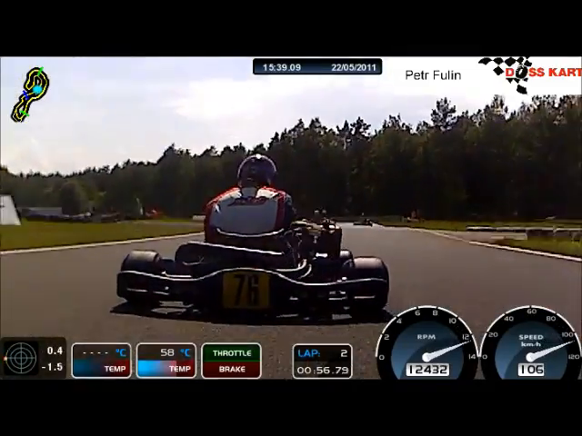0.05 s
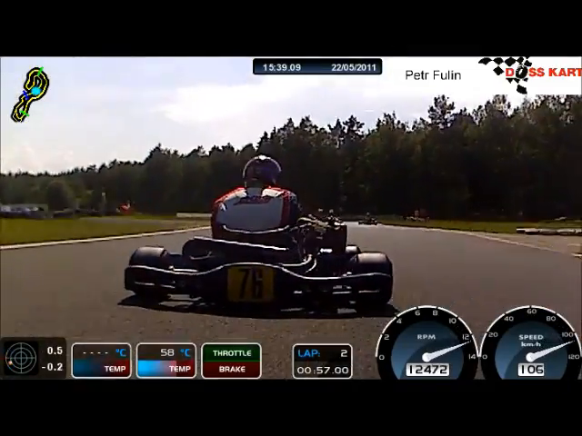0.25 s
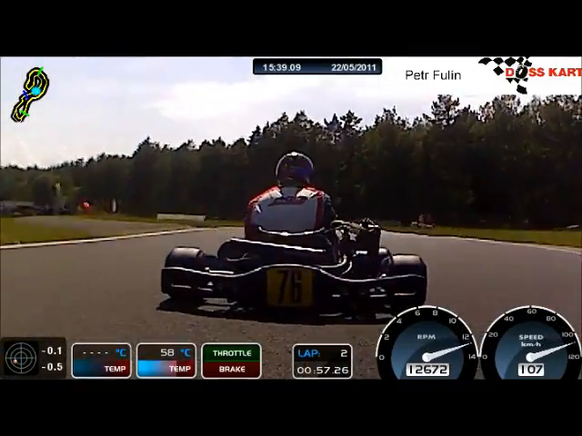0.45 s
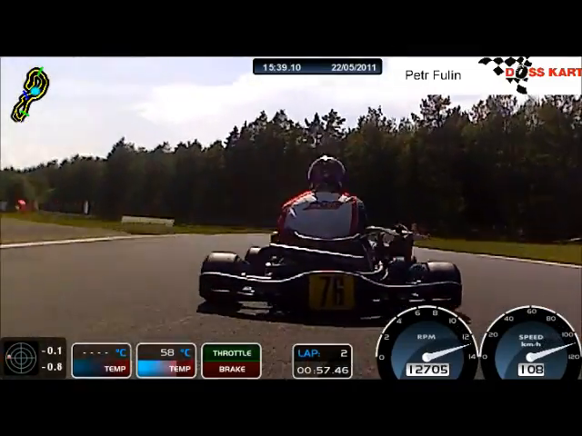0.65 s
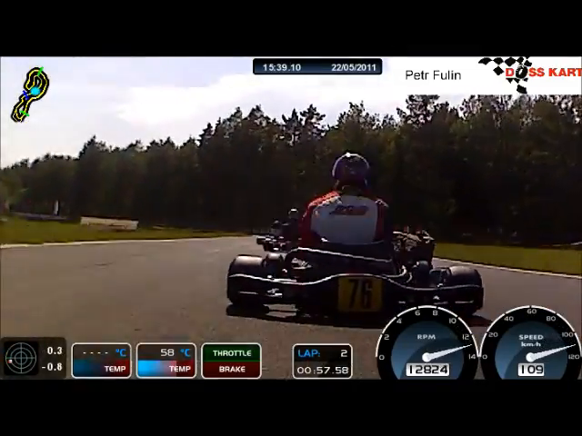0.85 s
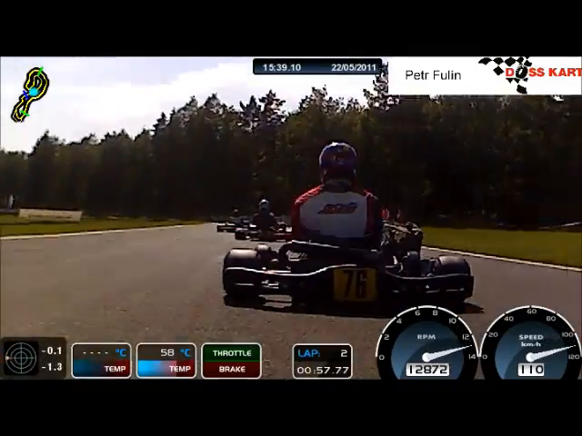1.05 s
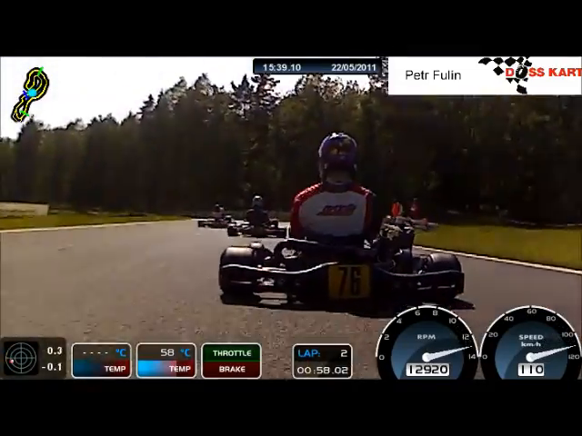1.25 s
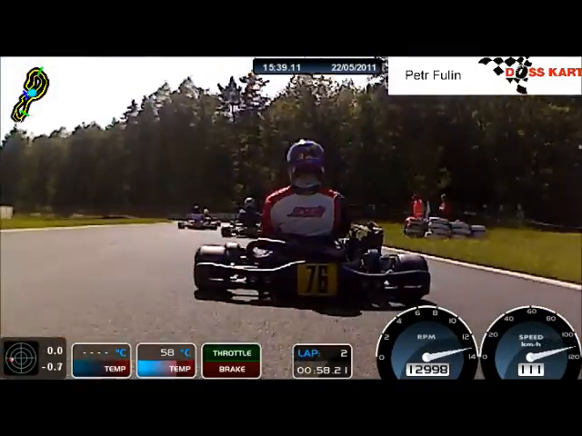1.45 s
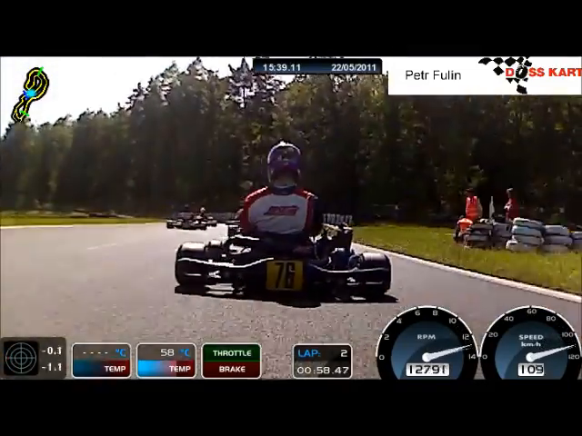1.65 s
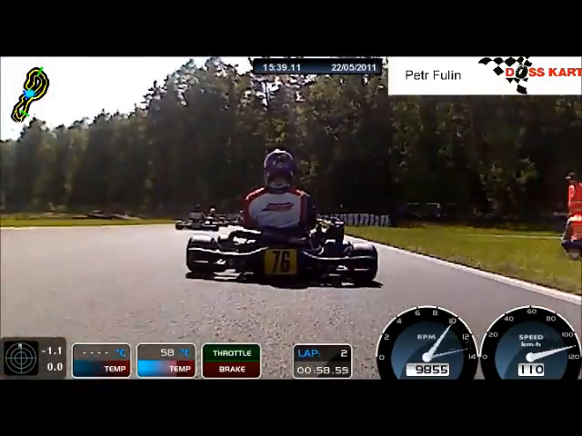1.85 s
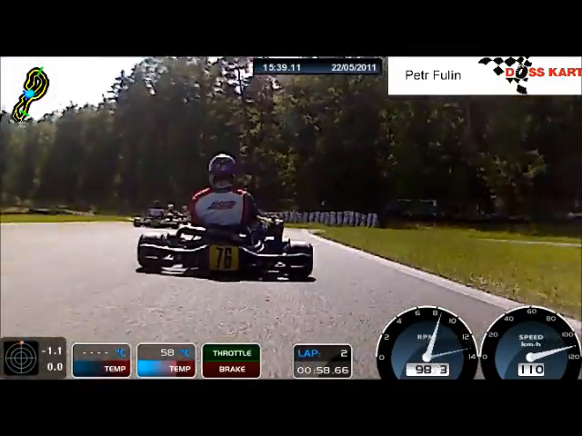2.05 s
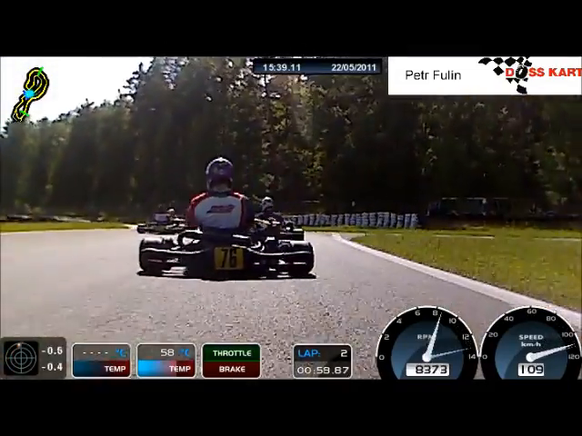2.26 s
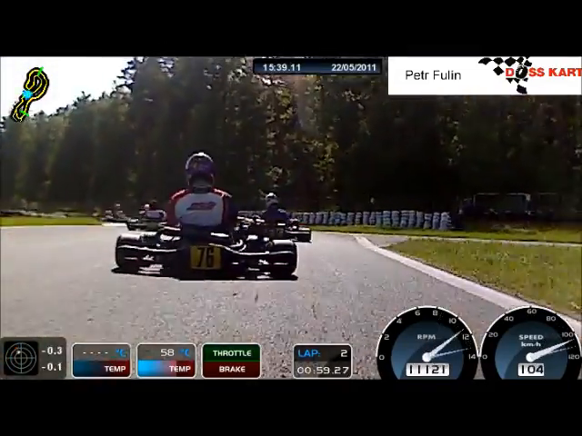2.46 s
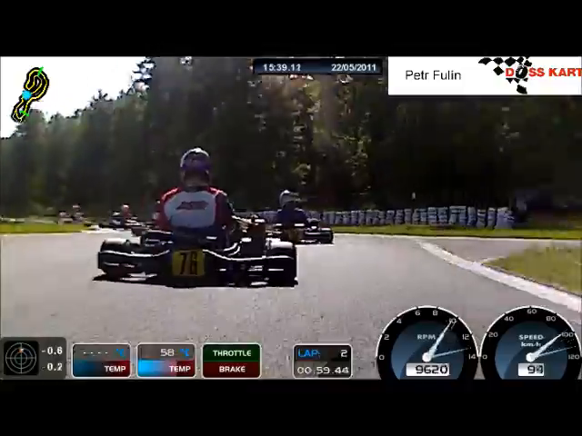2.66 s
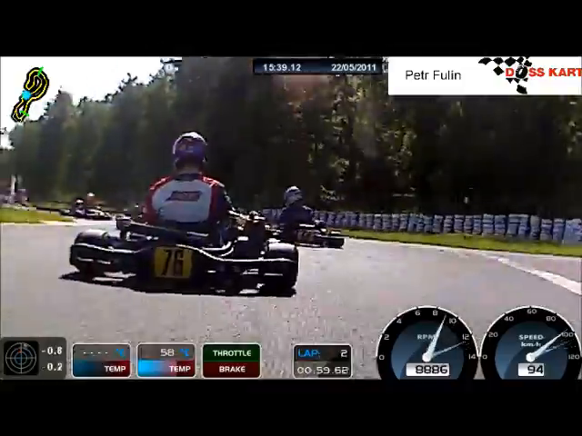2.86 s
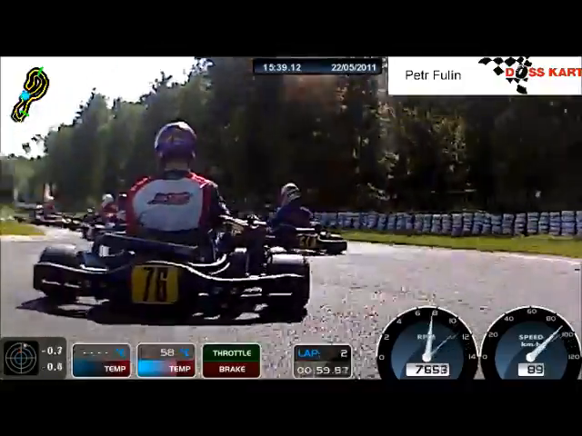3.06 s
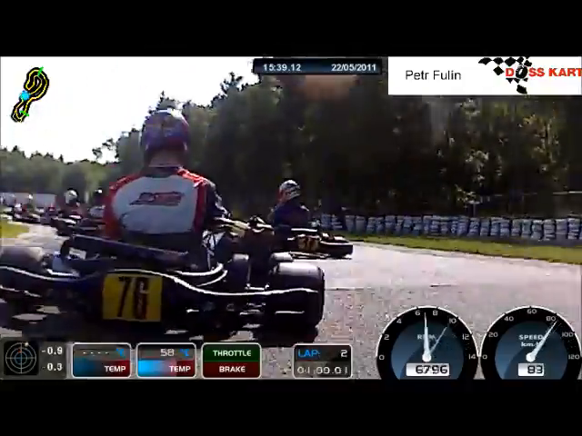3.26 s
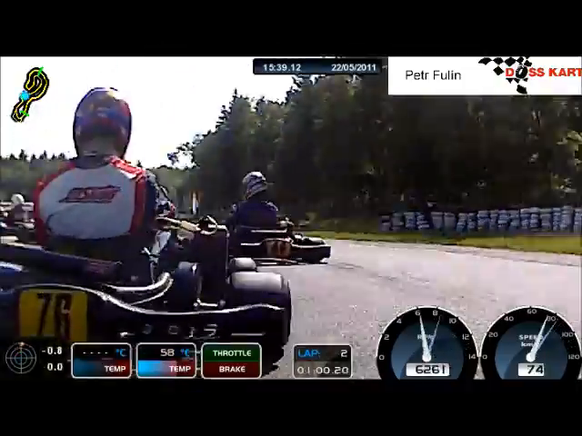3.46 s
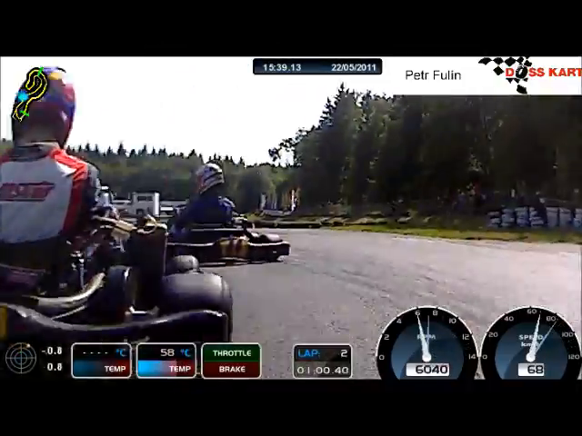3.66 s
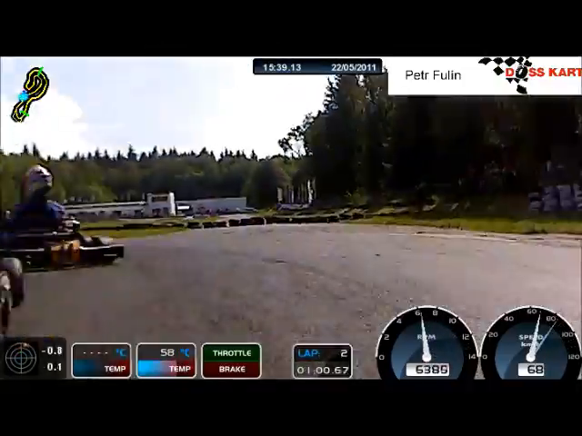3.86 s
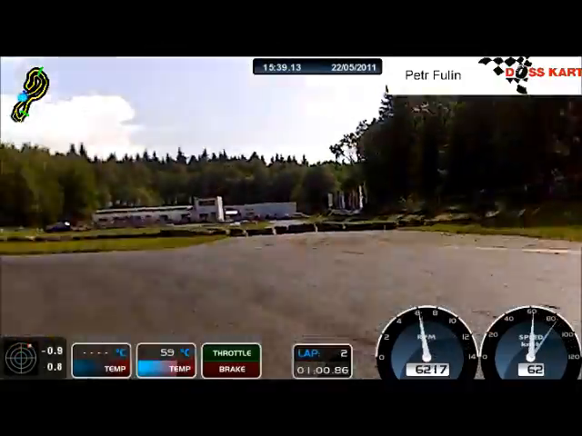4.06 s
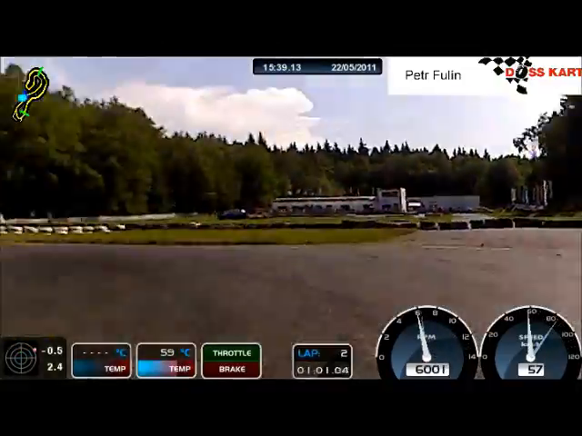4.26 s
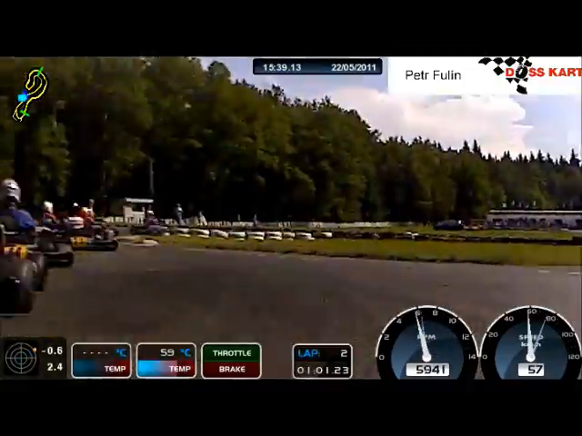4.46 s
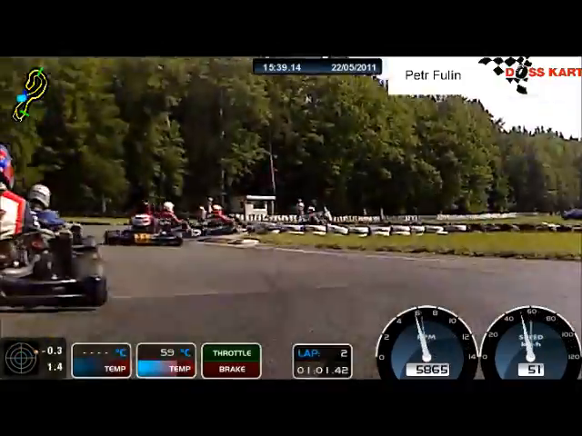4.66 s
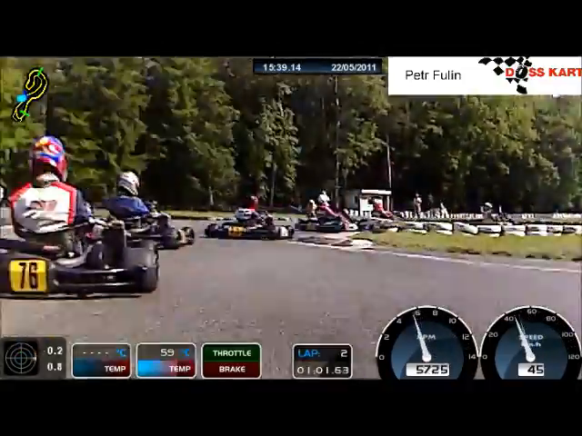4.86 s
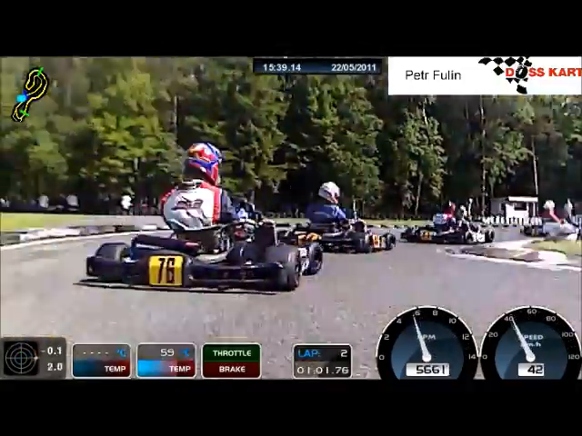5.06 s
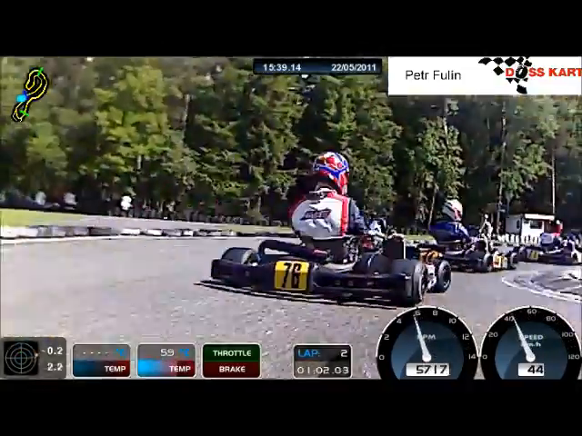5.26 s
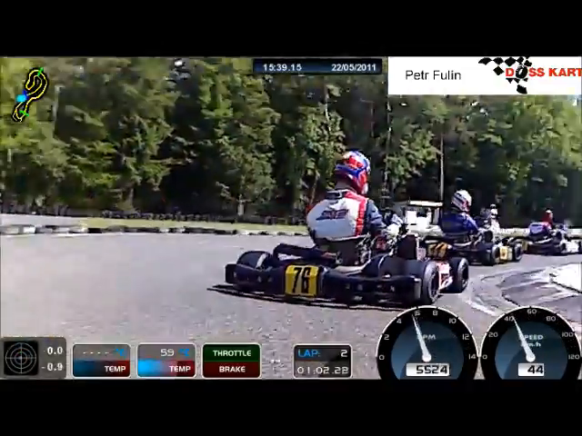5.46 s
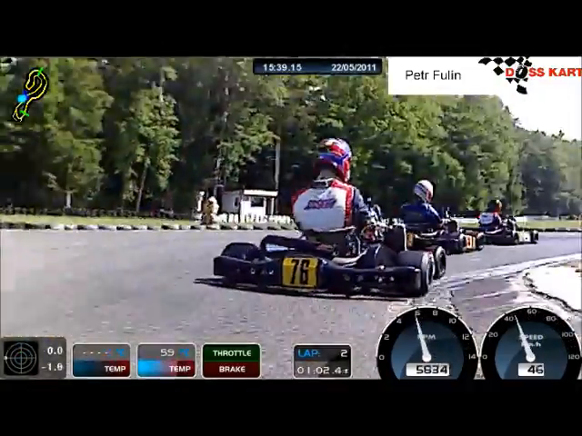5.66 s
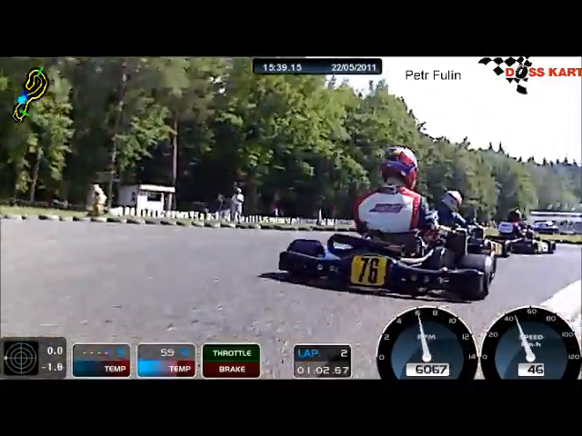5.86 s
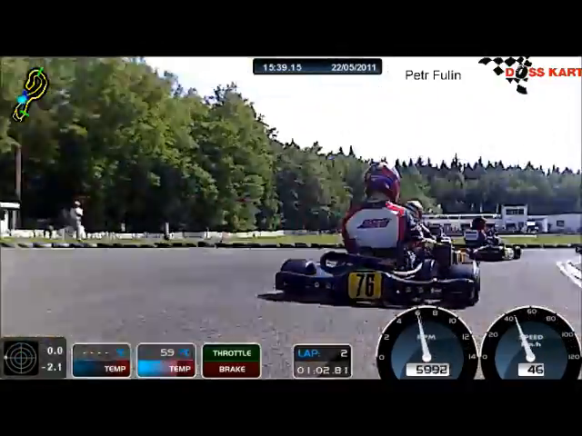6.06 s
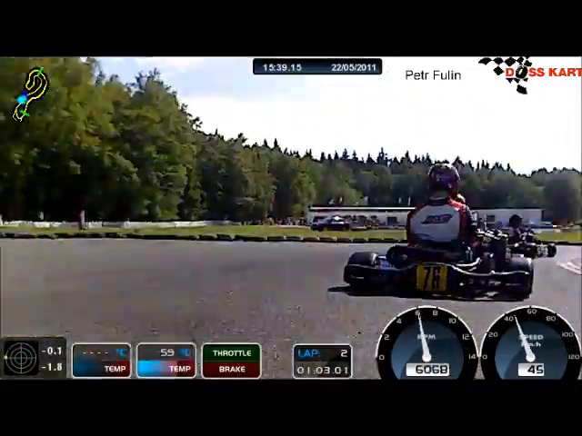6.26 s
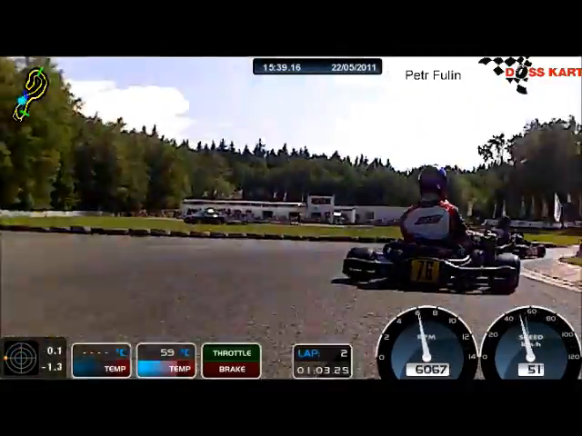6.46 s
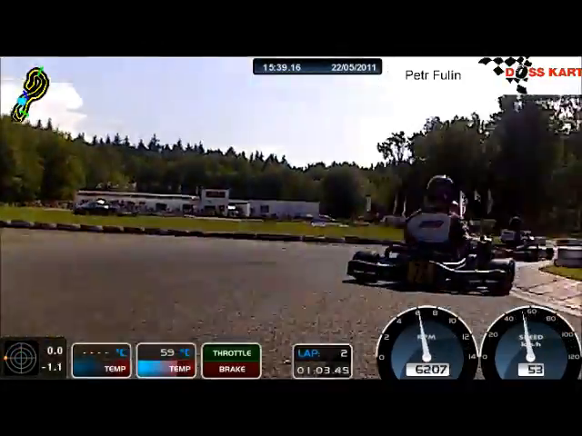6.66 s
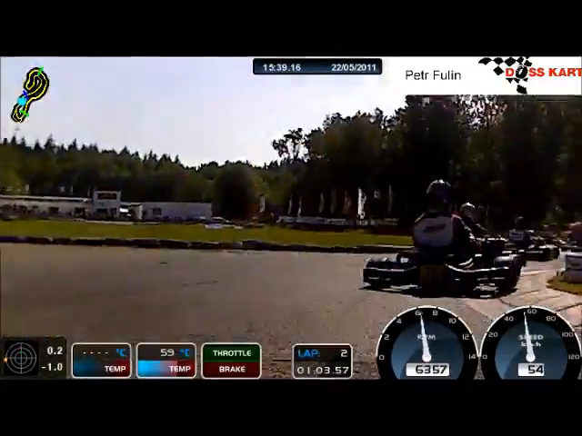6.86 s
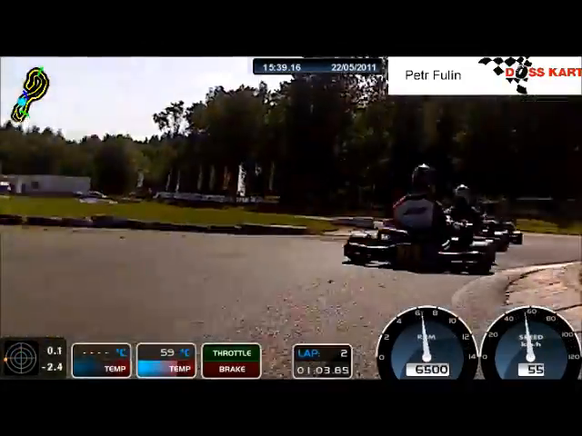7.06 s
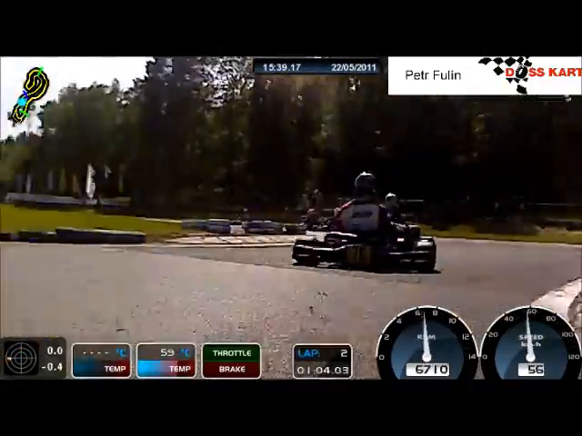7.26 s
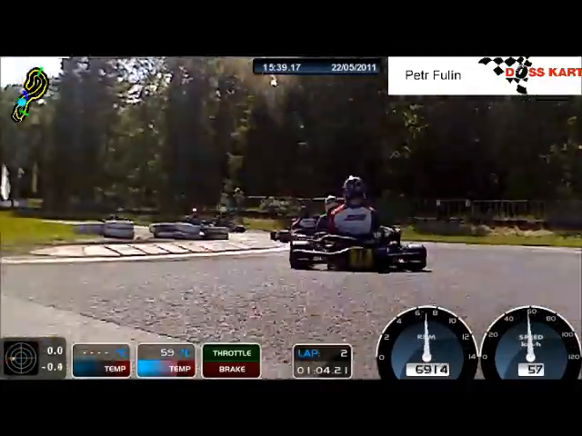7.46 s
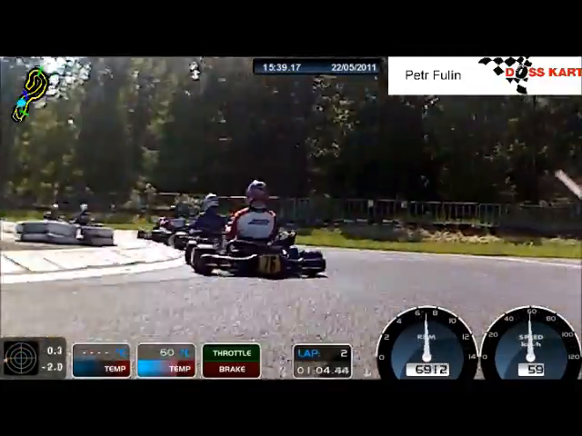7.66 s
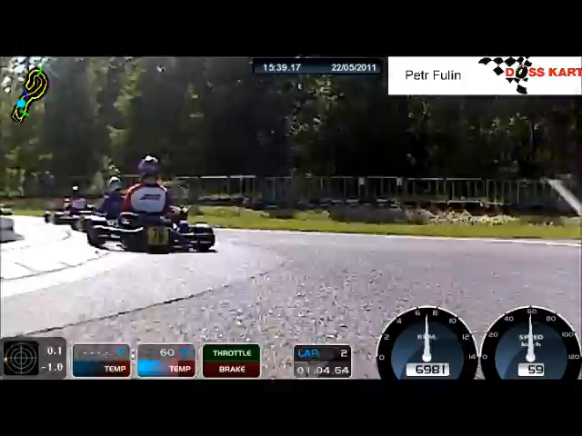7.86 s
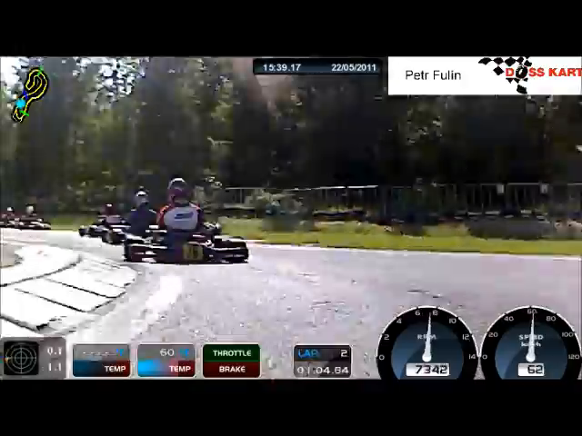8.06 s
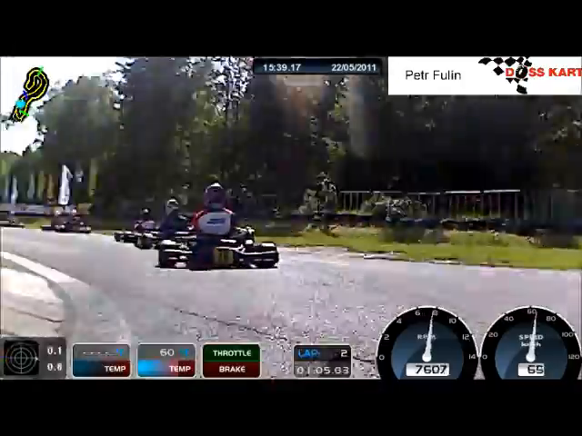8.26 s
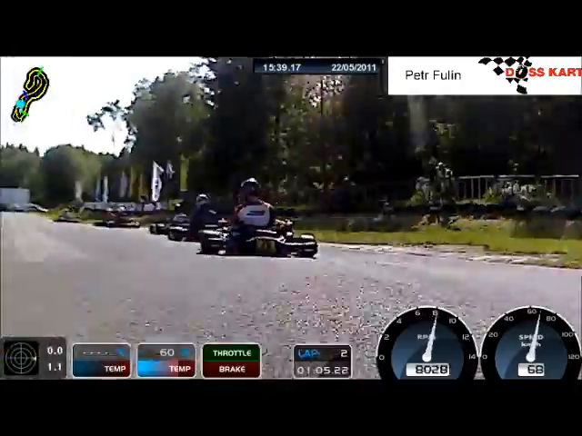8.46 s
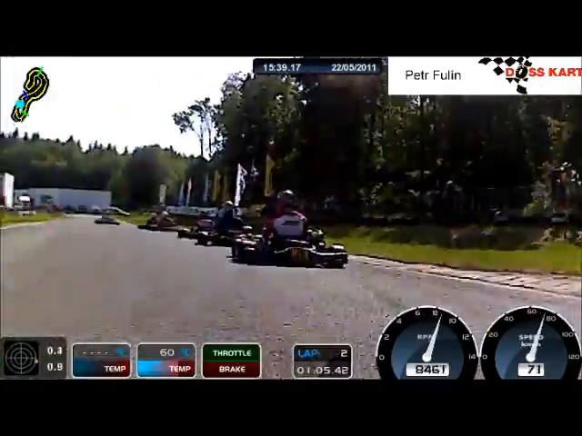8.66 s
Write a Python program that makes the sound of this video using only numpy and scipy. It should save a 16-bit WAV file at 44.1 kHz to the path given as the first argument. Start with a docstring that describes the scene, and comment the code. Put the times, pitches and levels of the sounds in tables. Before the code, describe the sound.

An onboard racing kart's two-stroke engine screams flat out, gets dragged down under hard braking, burbles unevenly through a corner, then climbs again.

```python
"""Onboard a racing kart: its single-cylinder two-stroke runs flat out, overloading the microphone.
The brakes nearly lock the rear axle and drag the engine down; the tyres bite again, the kart slows
through a corner over some grit and pulls away. Filtered noise makes wind, road, scrub and grit; short
sines make bumps and a chirp. The engine is firing pulses and gas noise through exhaust filters, plus
sines locked to the crank."""
import sys
import numpy as np
from scipy import signal
from scipy.fft import rfft, irfft, next_fast_len
from scipy.io import wavfile

SR = 44100
rng = np.random.default_rng(int(sys.argv[2]) if len(sys.argv) > 2 else 0)


def bounce(signal):
    """Save signal as a 16-bit WAV file at the path given by the first command-line argument."""
    frames = np.transpose(np.atleast_2d(signal))
    limited = np.clip(frames, -1, 1)
    pcm = np.round(limited * 32767).astype(np.int16)
    wavfile.write(sys.argv[1], SR, pcm)


N = 383669
TIME = np.arange(N) / SR
BITE_S = 2.038   # the rear tyres grip again
GEAR_RATIO = 6.2   # firings per turn of the axle


def from_db(db):
    """Decibels to gain."""
    return 10 ** (np.asarray(db) / 20)


def rms_one(x):
    """Scale to rms 1."""
    return x / np.sqrt(np.mean(x ** 2) + 1e-20)


def noise():
    """White noise for the whole scene."""
    return rng.standard_normal(N)


def in_time(rows):
    """Each column of a curve at every sample."""
    s, *columns = np.transpose(rows)
    return [np.interp(TIME, s, c) for c in columns]


def at_speed(rows, rate):
    """Each column of a response at the current engine speed."""
    hz, *columns = np.transpose(rows)
    return [np.interp(rate, hz, c) for c in columns]


def drift(rate):
    """Slow random wander of rms 1: noise through two equal poles at rate Hz, computed every 40 samples."""
    r = np.exp(-80 * np.pi * rate / SR)
    slow = signal.lfilter([1], [1, -2 * r, r * r], rng.standard_normal(N // 40 + 2002))
    slow = rms_one(slow[2000:])   # skip the filter's settling
    return np.interp(np.arange(N) / 40, np.arange(len(slow)), slow)


def coloured(x, spectrum):
    """Causal (minimum-phase) filter with the given spectrum, 24 dB per octave outside it; rms 1."""
    size = next_fast_len(N + SR // 4, real=True) // 2 * 2
    hz, db = np.transpose(spectrum)
    bins = np.maximum(np.arange(size // 2 + 1) * SR / size, 1)
    octaves_outside = np.maximum(np.log2(hz[0] / bins), 0) + np.maximum(np.log2(bins / hz[-1]), 0)
    gain_db = np.interp(np.log(bins), np.log(hz), db) - 24 * octaves_outside
    cepstrum = irfft(np.log(from_db(gain_db)))
    # keeping only the first half of the cepstrum makes the filter causal
    response = np.exp(2 * rfft(cepstrum[:size // 2], size))
    return rms_one(irfft(rfft(x, size) * response)[:N])


def air_and_road(turns, throttle, shut_boost_db=5.0):
    """Wind rush and buffeting, asphalt rumble and the unbalanced axle; buffet and axle grow off throttle."""
    # wind before each layer's own offset: start_s, relative_level_db
    wind_curve = [(0, -45.5), (.38, -49.5), (1.1, -51.5), (1.65, -56), (2.1, -61.5), (8.7, -60.5)]
    # chassis rumble before its wander: start_s, level_db
    road_curve = [(0, -27), (1, -31), (1.6, -28.5), (1.95, -36.5), (2.1, -34.5), (3.3, -35), (4.3, -35.5),
                  (6, -30), (7.3, -34.5), (8.7, -32)]
    # spectra: frequency_hz, relative_density_db (per Hz)
    rush_spectrum = [(150, -1), (400, 19.5), (800, 20), (1100, 9), (1700, 15.5), (2300, 0), (3600, -2.5),
                     (5000, -3), (6000, -2.5), (6500, -5), (7400, -4.5), (8000, -6)]
    buffet_spectrum = [(16, -8), (26, -1), (40, 0.5), (60, -6.5), (120, -18)]
    rumble_spectrum = [(40, -18), (60, -4.5), (80, -1), (115, 3), (170, -2.5), (260, -8), (420, -5.5),
                       (700, -25), (1500, -50.5)]
    (wind_db,), (road_db,) = in_time(wind_curve), in_time(road_curve)
    shake_db = wind_db + shut_boost_db * (1 - throttle)
    rush = from_db(wind_db + 15.5 + 1.5 * drift(54)) * coloured(noise(), rush_spectrum)
    buffet = from_db(shake_db + 15.0) * coloured(noise(), buffet_spectrum)
    rumble = from_db(road_db + 1.2 * drift(10)) * coloured(noise(), rumble_spectrum)
    wobble = from_db(shake_db + 20.0 + 2.9 * drift(6)) * np.sin(2 * np.pi * turns / GEAR_RATIO)
    highpass = signal.butter(2, 30, "high", fs=SR, output="sos")
    return rush + buffet + rumble + signal.sosfilt(highpass, wobble)


def bumps():
    """Bumps and tyre judder set the frame shuddering: short sine swells with wandering phase."""
    # one shudder a row: centre_s, length_s, pitch_hz, peak_level_db
    bump_rows = [(1.908, .11, 76, -24), (2.078, 0.062, 83.6, -22), (2.724, 0.23, 80, -32),
                 (3.459, 0.042, 100, -21.5), (3.763, 0.069, 104, -23), (4.042, 0.085, 80, -20),
                 (5.945, 0.074, 135, -19), (6.033, .08, 118, -19.5), (6.94, .08, 88, -22.5),
                 (7.74, .07, 95, -25.5)]
    out = np.zeros(N)
    for s, length, hz, db in bump_rows:
        swell = np.exp(-2 * ((TIME - s) / length) ** 2)
        out += from_db(db) * swell * np.sin(2 * np.pi * hz * TIME + 0.82 * drift(29))
    return out


def grit(level_db=-1.5):
    """Small stones tick on the plastic nose: sudden noise bursts that die away exponentially."""
    # one tick a row: start_s, relative_level_db, ring_out_s
    ticks = [(3.643, -37, 0.0031), (3.67, -38, 0.0035), (3.737, -33.5, .004), (3.792, -33.5, .003),
             (3.875, -33, .003), (3.891, -34, 0.0091), (3.902, -35, 0.01), (3.914, -38, 0.0062),
             (3.933, -40, 0.0018), (3.952, -30.5, 0.0023), (4.047, -38, .003)]
    # ring of the bodywork: frequency_hz, relative_density_db (per Hz)
    ring_spectrum = [(300, -23), (800, 20), (1400, 1), (1950, 13.5), (2300, -5), (3000, 8.5), (4000, -4),
                     (5500, -6), (7500, -10)]
    bursts = sum(from_db(db) * (TIME > s) * np.exp(-np.abs(TIME - s) / ring) for s, db, ring in ticks)
    return from_db(level_db) * bursts * coloured(noise(), ring_spectrum)


def tyre_chirp(centre_s=4.035, length_s=0.025, pitch_hz=1350, peak_db=-45):
    """A tyre squeaks briefly as the kart turns in: one unsteady sine under a short swell."""
    swell = np.exp(-((TIME - centre_s) / length_s) ** 2)
    return from_db(peak_db) * swell * np.sin(2 * np.pi * pitch_hz * TIME + 0.91 * drift(60))


def tyre_scrub(stall, level_db=-49.5):
    """The rear tyres scrub over the asphalt as the axle nears locking: noise swelling with the snatch."""
    # frequency_hz, relative_density_db (per Hz)
    scrub_spectrum = [(900, -14), (1400, -11), (1950, 6), (2300, -12), (3000, -10), (6000, -19)]
    return stall ** 2 * from_db(level_db + 2.5 * drift(20)) * coloured(noise(), scrub_spectrum)


def tyre_bite(rise_s=0.0025, decay_s=0.013, level_db=-11.5):
    """The axle jolts as the tyres grip again: a noise thump with a fast rise and short decay."""
    # frequency_hz, relative_density_db (per Hz)
    jolt_spectrum = [(120, -5), (350, 7), (600, 3.5), (850, -12), (1500, -15.5), (2200, -34), (3200, -35),
                     (6000, -51)]
    age = np.maximum(TIME - BITE_S, 0)
    envelope = (1 - np.exp(-age / rise_s)) * np.exp(-age / decay_s)
    return from_db(level_db) * envelope * coloured(noise(), jolt_spectrum)


def engine_speed():
    """Firings per second: the straight, the drag of the nearly locked axle, then the corner."""
    # down the straight and onto the brakes: start_s, firing_rate_hz
    straight_curve = [(0.12, 208.4), (0.28, 212.3), (0.566, 210.5), (0.604, 215), (1.374, 215.8),
                      (1.528, 209.6), (1.562, 196), (1.588, 177.4), (1.624, 162), (1.69, 150)]
    # into the corner and out of it: start_s, firing_rate_hz
    corner_curve = [(2.05, 181.5), (2.1, 187.6), (2.38, 164.3), (2.58, 140.6), (3.03, 112.8), (3.25, 101),
                    (3.33, 116), (3.38, 93), (3.44, 120), (3.49, 91.6), (3.62, 112), (3.72, 101),
                    (3.75, 105), (3.99, 98.3), (4.44, 99.2), (4.73, 94.5), (5.12, 98.1), (5.22, 91.7),
                    (5.72, 105.8), (5.77, 103), (5.88, 97.6), (5.94, 103), (6.05, 104), (6.11, 109),
                    (6.16, 100), (6.48, 105.1), (6.51, 109.8), (6.59, 104.5), (7.07, 114.4), (7.13, 118),
                    (7.44, 114), (7.64, 117), (8.57, 146.4), (8.7, 139)]
    lock_s, drag_hz_per_s, locked_hz, spin_up_s = 1.71, 290, 84.65, 0.022
    (straight,), (corner,) = in_time(straight_curve), in_time(corner_curve)
    dragged = np.maximum(straight - drag_hz_per_s * np.maximum(TIME - lock_s, 0), locked_hz)
    grip = np.clip((TIME - BITE_S) / spin_up_s + .5, 0, 1)
    return dragged + grip * (corner - dragged)


def firings(turns, rough, jitter_s, spread_db):
    """One pulse per crank turn, uneven in time and strength; steady power at any speed."""
    at = np.interp(np.arange(1, int(turns[-1])), turns, np.arange(N))   # in samples
    chance = rng.standard_normal((N // 200, 2))[:len(at)]
    late, strong = chance.T * rough[at.astype(int)]
    size = from_db(spread_db * np.clip(strong, -2, 1)) * np.sqrt(np.gradient(at))
    at = np.clip(at + late * jitter_s * SR, 0, N - 2)
    # share each pulse between its two nearest samples
    whole, part = at.astype(int), at % 1
    return rms_one(np.bincount(whole, size * (1 - part), N) + np.bincount(whole + 1, size * part, N))


def scattered(x, echo=0.63, echo_s=0.003506, sway_s=0.00041):
    """The pipe smears pulses (all-passes); a shifting echo off the track makes orders swell and fade."""
    for lag in (17, 31):   # samples
        gap = np.zeros(lag - 1)
        x = signal.lfilter(np.r_[.5, gap, 1], np.r_[1, gap, .5], x)
    return rms_one(x + echo * np.interp(TIME - echo_s - sway_s * drift(2.58), TIME, x))


def gas_noise(turns, depth):
    """Turbulence: noise that swells just after each firing."""
    return rms_one(noise() * (1 + depth * np.cos(2 * np.pi * (turns - 1 / 8))))


def voice_db(law, rate, throttle):
    """Level of one engine voice: it grows with each octave of revs, blended by throttle."""
    open_db, open_slope_db, shut_db, shut_slope_db = law
    octaves = np.log2(rate / 130.3)   # from middling revs, in firings per s
    open_level_db = open_db + open_slope_db * octaves
    shut_level_db = shut_db + shut_slope_db * octaves
    return throttle * open_level_db + (1 - throttle) * shut_level_db


def singing_pipe(turns, rate, throttle):
    """Near top revs a few orders stand out as clean sines; the third needs an open throttle."""
    # firing_rate_hz, high_orders_level_db, third_order_level_db
    sing_response = [(197, -38, -34), (208.4, -45, -23), (211, -32, -30.5), (213, -33, -41.5),
                     (215, -32, -45.5), (218.4, -40.5, -48.5)]
    # order (multiple of the firing rate), relative_level_db
    pipe_orders = [(4, -14.5), (5, -7), (6, -6), (7, 4), (9, -6.5), (11, -29), (14, -20.5)]
    high_db, third_db = at_speed(sing_response, rate)
    lines = np.zeros(N)
    for order, db in pipe_orders:
        phase = 2 * np.pi * order * turns + 0.38 * drift(9.6)
        lines += from_db(db + 2.4 * drift(4.4)) * np.sin(phase)
    third = throttle * from_db(third_db + 3.3 * drift(18)) * np.sin(6 * np.pi * turns)
    return from_db(high_db) * lines + third


def drone(turns, rate, throttle, rough, flutter_db=6.5, lag_rad=3.08):
    """The two lowest orders are near sines, shaken by uneven firing and by each turn of the axle."""
    # exhaust resonances: firing_rate_hz, first_order_relative_db, second_order_relative_db
    drone_response = [(96.8, -28, -45.5), (104.2, -28.5, -38), (116, -27.5, -35), (133, -30, -42.5),
                      (139.6, -23, -38), (150.3, -20.5, -23), (166.3, -33.5, -16.5), (178.1, -23.5, -10.5),
                      (186, -25, -12), (210.6, -11.5, -15), (217.3, -16, -13)]
    first_db, second_db = at_speed(drone_response, rate)
    # both orders weaken with the throttle shut
    first_db = first_db - 2.5 * (1 - throttle) - 0.83
    second_db = second_db - 5 * (1 - throttle) + 1.48
    angle = 2 * np.pi * (turns - .08)
    shake = 1 + 0.13 * np.sin(angle / GEAR_RATIO + 0.27 * drift(6.4))
    first_phase = angle + .45 * rough * drift(28)
    first = from_db(first_db + flutter_db * rough * drift(25)) * np.cos(first_phase)
    # the second order swings in phase as it climbs through the pipe's resonance
    swing = np.interp(rate, [180, 208, 215], [0, -1.3, .4])
    second_phase = 2 * angle + lag_rad + swing + 0.48 * rough * drift(26)
    second = from_db(second_db + flutter_db * rough * drift(17)) * np.cos(second_phase)
    return np.sqrt(2) * shake * (second - first)


def exhaust(turns, rate, throttle, stall, rough, on_pipe, surge_db=3.0, gas_shut=.3, pipe_rasp_db=-1.5):
    """Blow-down pulses and gas noise sound the pipe, the silencer shell and the cylinder fins."""
    # level laws at middling revs: open_level_db, open_slope_db_per_octave,
    # shut_level_db, shut_slope_db_per_octave (before ceiling, stall and surge)
    bark_law = (-30, 17, -32, 15)
    rasp_law = (-39.5, 11.5, -51, 17)
    clatter_law = (-54.5, 15.5, -59, 12.5)
    # spectra, throttle open and shut: frequency_hz, relative_density_db (per Hz)
    bark_open = [(190, -29), (270, -1.5), (340, 6), (430, 2.5), (500, -2), (580, 0.5), (650, -4),
                 (790, -10.5), (900, -22), (980, -12), (1060, -36.5), (1400, -54.5)]
    bark_shut = [(190, -24.5), (280, -11.5), (345, 4.5), (385, 6.5), (430, 9), (500, -3), (600, -10),
                 (760, -8.5), (860, -21), (940, -7.5), (1040, -21.5), (1130, -15.5), (1400, -35)]
    rasp_open = [(1000, -34), (1160, -10.5), (1220, -5.5), (1280, 4), (1330, -4.5), (1395, 6), (1460, -2),
                 (1560, -3), (1720, -1.5), (1810, -6), (1960, 0.5), (2100, -26), (2500, -40)]
    rasp_shut = [(950, -26), (1150, -11), (1350, 3), (1450, 3), (1650, 3.5), (1830, 1.5), (1960, 5),
                 (2100, -12), (2500, -21)]
    clatter_spectrum = [(1900, -29), (2200, -12), (2500, -7), (2890, 3), (3030, -1), (3300, 2),
                        (3500, -9.5), (3800, -9.5), (4160, 0.5), (4550, -11), (5000, -11.5), (6500, -35.5)]
    # the silencer holds the bark down at high revs; a full snatch costs it 16.5 dB
    bark_db = np.minimum(voice_db(bark_law, rate, throttle), -24.5) - 16.5 * stall
    rasp_db = voice_db(rasp_law, rate, throttle) + pipe_rasp_db * on_pipe - 6 * stall
    clatter_db = voice_db(clatter_law, rate, throttle)
    pulses = -scattered(firings(turns, rough, jitter_s=0.00016, spread_db=4.5))
    pulses = pulses * (1 - .9 * on_pipe)   # at top revs the buzz gives way to a few clean lines
    low_gas = (0.78 * rough + .6 * on_pipe) * gas_noise(turns, depth=0.47)
    high_gas = (rough + gas_shut * (1 - throttle) + .7 * on_pipe) * gas_noise(turns, depth=1.0)
    low, high = pulses + low_gas, pulses + high_gas
    bark = throttle * coloured(low, bark_open) + (1 - throttle) * coloured(low, bark_shut)
    rasp = throttle * coloured(high, rasp_open) + (1 - throttle) * coloured(high, rasp_shut)
    clatter = coloured(0.36 * pulses + gas_noise(turns, depth=0.31), clatter_spectrum)
    clatter = from_db(1.1 * drift(35)) * clatter
    voices = from_db(bark_db) * bark + from_db(rasp_db) * rasp + from_db(clatter_db) * clatter
    return from_db(surge_db * rough * drift(10)) * voices


def scene():
    """Revs and throttle drive every engine layer; wind, road and small knocks join it."""
    # start_s, throttle_opening (0-1)
    throttle_curve = [(0, 0.96), (1.42, 0.78), (1.58, .1), (4.47, 0.05), (4.59, 0.7), (4.9, 0.5),
                      (5.3, 0.7), (5.45, .95), (5.82, 0.52), (6.25, .8), (6.58, .65), (6.75, .9), (7.7, 1),
                      (7.9, .65), (8.16, 0.6), (8.3, .75), (8.7, 0.9)]
    # the brakes snatch and the engine hardly fires: centre_s, length_s, depth (0-1)
    snatches = [(1.671, 0.095, 0.23), (1.872, .06, .9), (1.995, 0.058, 1), (3.494, .05, 0.3),
                (4.001, .045, .6), (4.439, .08, 0.32)]
    rate = engine_speed()
    throttle = np.clip(in_time(throttle_curve)[0], 0, 1)
    stall = sum(depth * np.exp(-((TIME - s) / length) ** 2) for s, length, depth in snatches)
    stall = np.clip(stall, 0, 1)
    # firings grow uneven at low revs, with the throttle shut and near a stall
    rough = np.clip(.21 * 210.6 / rate + .14 * (1 - throttle) + 0.21 * stall, 0, 1)
    on_pipe = np.clip((rate - 190) / 15, 0, 1)   # 0-1 as the revs near the top
    hunting = .014 * rough * (1 - .6 * on_pipe) * drift(10.5)   # the speed wavers, most at low revs
    turns = np.cumsum(rate * (1 + hunting)) / SR
    engine = from_db(-9 * stall) * drone(turns, rate, throttle, rough)
    engine += exhaust(turns, rate, throttle, stall, rough, on_pipe)
    engine += on_pipe * singing_pipe(turns, rate, throttle)
    tyres = tyre_scrub(stall) + tyre_bite() + tyre_chirp()
    return (air_and_road(turns, throttle) + bumps() + grit() + tyres + engine)[None]


def record(dry):
    """The camera adds a faint electronic whine, flattens the loudest peaks and cuts the top."""
    # whine of the electronics: pitch_hz, rms_level_db
    whine_lines = [(2666.7, -70), (5333.3, -71)]
    whine = sum(np.sqrt(2) * from_db(db) * np.sin(2 * np.pi * hz * TIME) for hz, db in whine_lines)
    clipped = dry / (1 + (dry / .51) ** 12) ** (1 / 12)   # soft ceiling at .51
    lowpass = signal.cheby2(16, 70, 8450, fs=SR, output="sos")   # 70 dB down from 8450 Hz
    return signal.sosfilt(lowpass, clipped + whine)


dry = scene()
out = record(dry)
bounce(out)
```